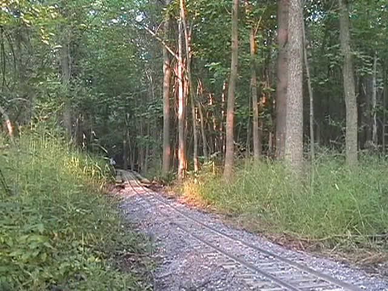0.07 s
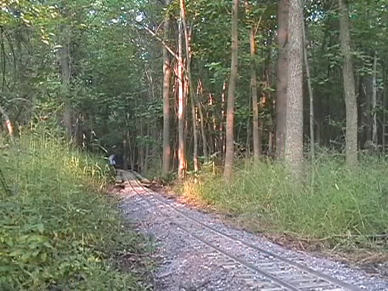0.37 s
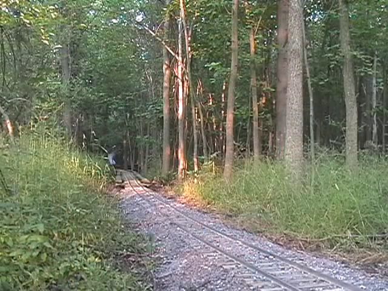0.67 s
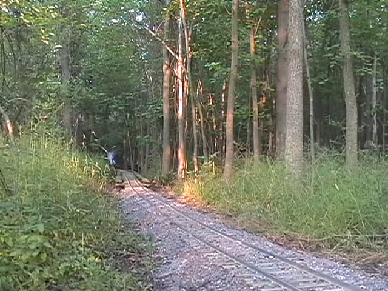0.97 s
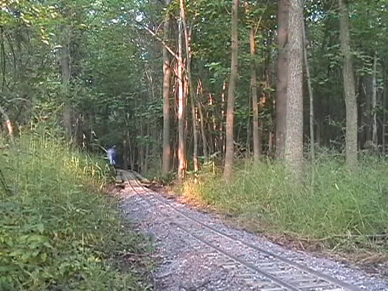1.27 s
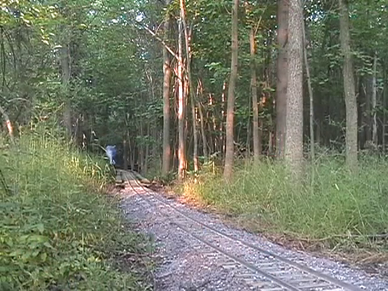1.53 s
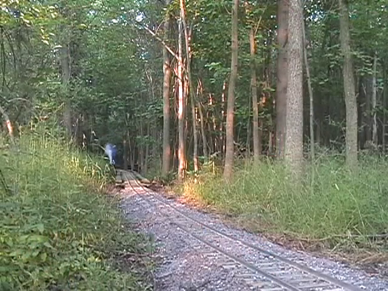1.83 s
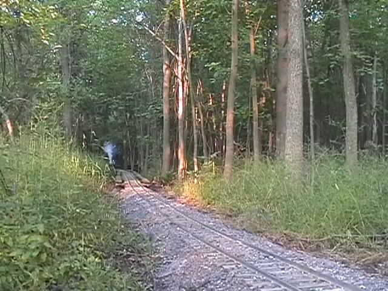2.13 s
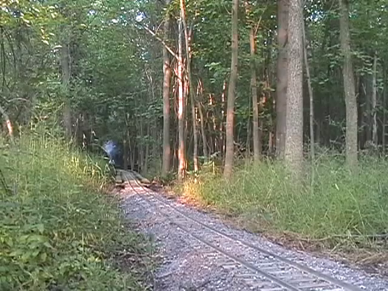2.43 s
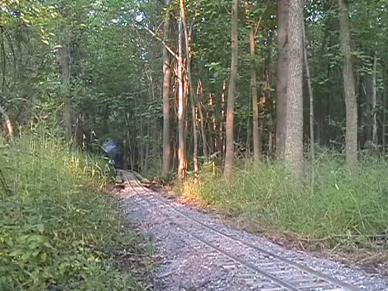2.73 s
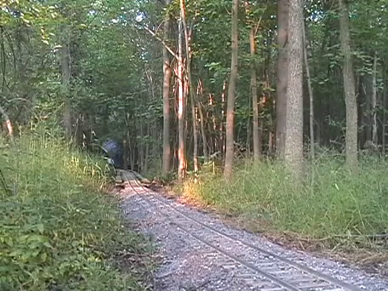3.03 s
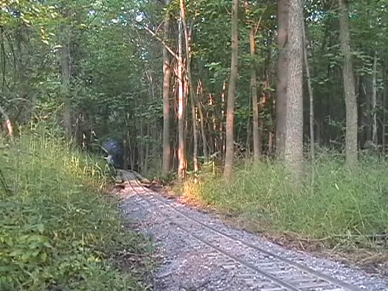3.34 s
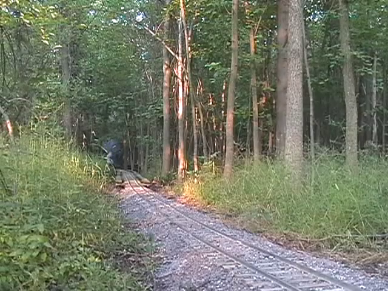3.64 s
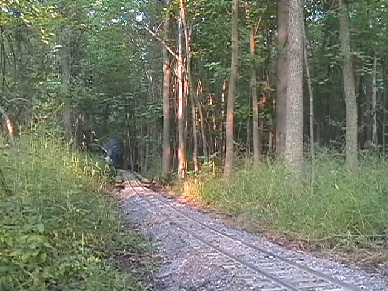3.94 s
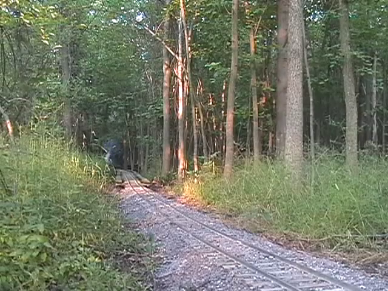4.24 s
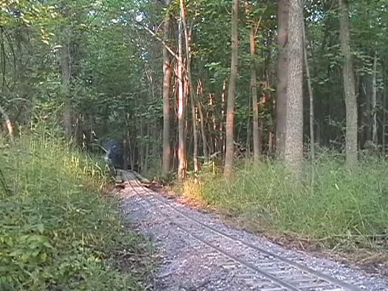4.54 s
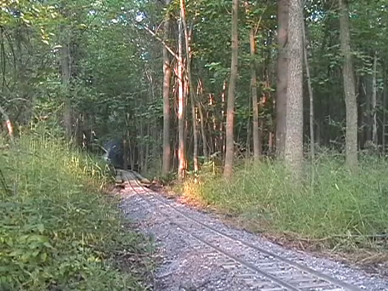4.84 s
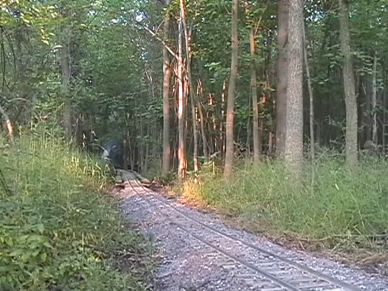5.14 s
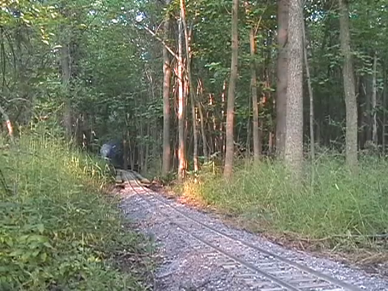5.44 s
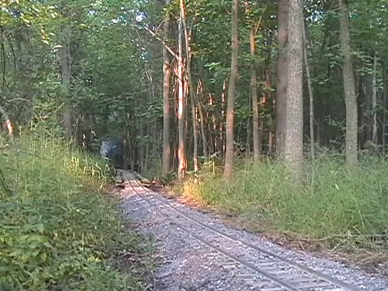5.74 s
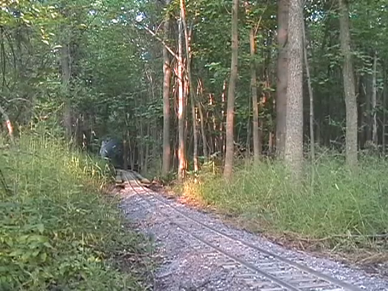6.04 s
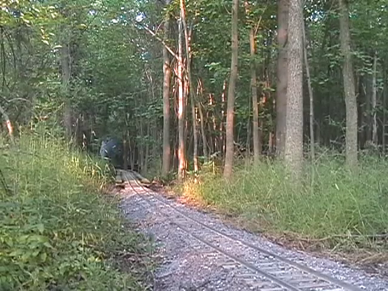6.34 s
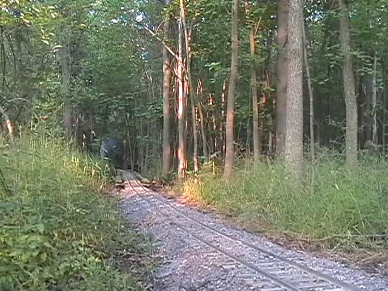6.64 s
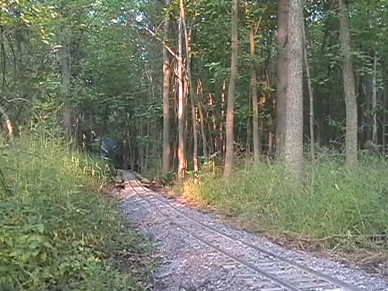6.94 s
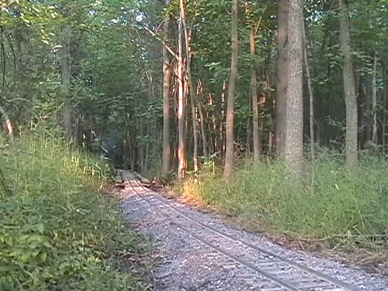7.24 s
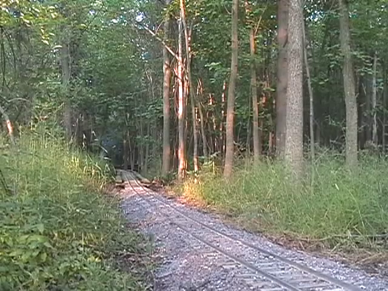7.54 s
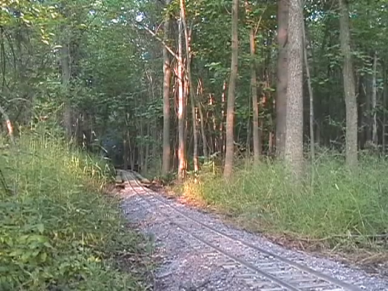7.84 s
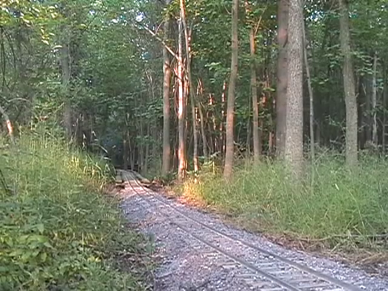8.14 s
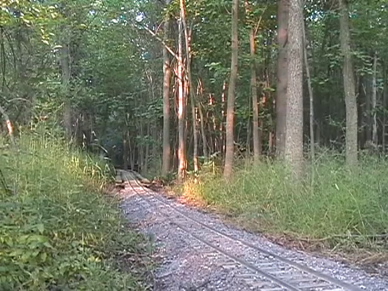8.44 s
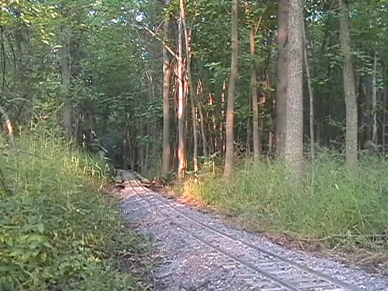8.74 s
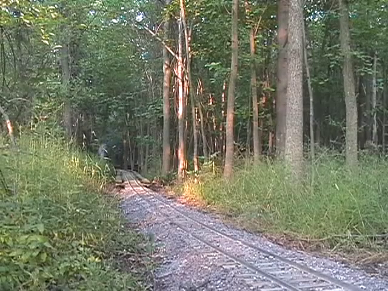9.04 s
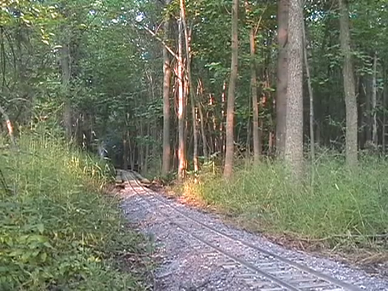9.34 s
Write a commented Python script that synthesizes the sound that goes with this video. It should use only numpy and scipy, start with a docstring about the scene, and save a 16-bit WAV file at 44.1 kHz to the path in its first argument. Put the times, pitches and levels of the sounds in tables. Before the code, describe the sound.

A small steam locomotive far off in the woods blows a high one-note whistle. A long blast swells from a breathy tone into a wavering note wrapped in steam hiss. Faint airy toots follow, then a louder long blast, a few quick toots and a final strong blast. Each echoes among the trees. Underneath, a faraway motor vehicle gathers speed and changes gear over a low rumble. The microphone stays still, at a distance.

```python
"""In the woods, a small steam locomotive far off blows its one-note whistle: three long blasts, a few toots.
Eased open, the whistle's bell only breathes; pulled hard, it locks into a wavering note in a hiss of
steam, and the trees scatter the note. Steam leaking past the valve rings hollow all the while.
Farther away a motor vehicle gathers speed and changes gear, over the low rumble of the still woods."""
import sys
import numpy as np
from scipy import signal
from scipy.fft import rfft, irfft
from scipy.io import wavfile
from scipy.ndimage import uniform_filter1d

SR = 44100
rng = np.random.default_rng(int(sys.argv[2]) if len(sys.argv) > 2 else 0)


def log_audio(samples):
    """Write samples as a 16-bit WAV file to the path given in sys.argv[1]."""
    # one column per channel
    frames = np.atleast_2d(samples).T
    # limit to full scale, then quantise
    limited = np.clip(frames, -1, 1)
    pcm = np.round(limited * 32767).astype(np.int16)
    wavfile.write(sys.argv[1], SR, pcm)


N = 418950
T = np.arange(N) / SR
HZ = np.fft.rfftfreq(N, 1 / SR)
FULL_VOICE_DB = -17.5  # note level from which the whistle is fully voiced
APPROACH_DB_PER_S = 0.84  # the leak past the shut valve grows as the locomotive nears


def gain_of(db):
    """Decibels to amplitude."""
    return 10 ** (np.asarray(db) / 20)


def unit_rms(x):
    """Scales to rms 1."""
    return x / np.sqrt(np.mean(x ** 2) + 1e-20)


def value_at(points, hz):
    """Reads (frequency, value) points on a log-frequency axis."""
    freq, value = np.transpose(points)
    return np.interp(np.log(hz + 1), np.log(freq), value)


def curves(rows):
    """Joins each column of a (time, values...) table by straight lines."""
    times, *columns = np.transpose(rows)
    return [np.interp(T, times, column) for column in columns]


def envelope(start, length, rise_s, fall_s):
    """Rises in a straight line, holds, then dies away."""
    attack = np.clip((T - start) / rise_s, 0, 1)
    return attack * np.exp(-np.clip((T - start - length) / fall_s, 0, np.log(1e12)))


def wander(rate_hz, size=32768):
    """Random drift of rms about 1, with little motion above the rate."""
    lowpass = 1 / (1 + (HZ[:size // 2 + 1] / rate_hz) ** 2)
    drift = irfft(rfft(rng.standard_normal(size)) * lowpass)
    return np.interp(T, np.linspace(0, T[-1], size), unit_rms(drift))


def noise(spectrum):
    """Stereo noise of rms 1, coloured by (frequency [Hz], level [dB]) points."""
    # how alike the two sides are: (frequency [Hz], correlation [0-1])
    likeness = [(60, 1), (110, 0.62), (200, 0.33), (380, 0.49), (700, 0.63), (1290, 0.76), (2400, 0.87),
                (5000, 0.86), (6800, 1), (8300, 0.48), (10000, 0.66), (15000, 1)]
    alike = np.clip(value_at(likeness, HZ), 0, 1)
    left, other = rfft(rng.standard_normal((2, N)))
    right = alike * left + np.sqrt(1 - alike ** 2) * other
    return unit_rms(irfft(np.array([left, right]) * gain_of(value_at(spectrum, HZ)), N))


def ringing(modes):
    """Steam noise through a few steady resonances."""
    hz = np.geomspace(200, 16000, 900)
    power = sum(gain_of(db) ** 2 / (1 + ((hz - centre) / width) ** 2) ** 2 for centre, width, db in modes)
    return noise(np.column_stack([hz, 10 * np.log10(power)]))


def tilted(x, tilt_db, pivot_hz=6000):
    """Moving tilt EQ: four overlapping bands tip the spectrum by roughly tilt_db per octave."""
    octaves = np.clip(np.log2((HZ + 1) / pivot_hz), -2, 1)
    spectrum = rfft(x)
    return sum(gain_of(centre * tilt_db) * irfft(spectrum * np.maximum(1 - abs(octaves - centre), 0), N)
               for centre in (-2.0, -1.53, 0.03, 0.9658))


def forest_air(level_db=-46.5):
    """The bed: a low distant rumble and a thin steady hiss among the trees."""
    # low and high halves of the bed's spectrum: (frequency [Hz], relative level [dB])
    rumble = [(20, -18), (36, -12), (47, 3.5), (58, -0.5), (75, 7.5), (95, 11.5), (120, 15.5), (150, 6),
              (240, 9), (310, 5), (520, 3.5), (610, 1.5), (1000, 6), (1300, 2.5)]
    hiss = [(1450, -5), (1950, 4), (2300, -5.5), (2650, -14), (3050, 1.5), (3900, -5.5), (4600, -11),
            (5500, -4), (6300, -7.5), (8000, -16), (12000, -19), (15500, -27)]
    return gain_of(level_db) * noise(rumble + hiss)


def vehicle(unsteady=0.011, fading_db=0.65):
    """Orders of an unevenly firing engine slide through the boom of its exhaust, each fading on its way."""
    # engine speed: (time [s], working cycles [Hz])
    revs = [(0, 13), (1, 15.7), (3, 14.6), (4, 16.7), (5, 18.4), (6.6, 21.5), (7, 25.3), (7.27, 24.8),
            (7.55, 21), (8.2, 17.4), (9.5, 21.6)]
    # the exhaust under throttle: (time [s], level [dB], lift of the upper orders [dB])
    throttle = [(0, -53.5, 2), (3, -49, -14.5), (5.2, -43, -7), (5.6, -47.5, -5), (6.7, -38, -4),
                (7.22, -40, 0), (7.66, -54.5, 5), (7.95, -47, 1.5), (8.4, -45.5, -3.5), (8.9, -51, -3),
                (9.5, -71.5, -8.5)]
    # uneven firing: (multiple of the cycle, relative level [dB])
    orders = [(4, -13), (5, 1), (6, -7.5), (7, 1.5), (8, -9), (9, -2), (10, -8.5), (11, -3), (12, -4.5),
              (13, -10.5), (14, -7), (16, -8.5)]
    # the exhaust pipe heard through the woods: (frequency [Hz], gain [dB])
    pipe = [(55, -28), (80, -22), (100, -5), (112, -4), (124, -2), (135, -7.5), (146, -9.5), (168, -7),
            (190, -10), (222, -7), (280, -13.5), (330, -7.5), (400, -17)]
    cycle_hz, = curves(revs)
    level_db, lift_db = curves(throttle)
    phase = 2 * np.pi * np.cumsum(cycle_hz * (1 + unsteady * wander(rate_hz=5.7))) / SR
    drone = np.zeros(N)
    for order, db in orders:
        hz = order * cycle_hz
        upper = np.clip((hz - 130) / 50, 0, 1)
        order_db = db + value_at(pipe, hz) + upper * lift_db + fading_db * wander(rate_hz=2.7)
        drone += gain_of(order_db) * np.cos(order * phase + 2 * np.pi * rng.random())
    return np.sqrt(2) * gain_of(level_db) * drone


def valve(shut_db=-55.5, close_s=0.055, sag=0.16):
    """Pulls on the valve set the jet's level and tilt and how loudly the valve sings."""
    # pulls: (start [s], length [s], opening time [s], hiss [dB], tilt [dB/octave], singing [dB])
    pulls = [(0.07, 1, 0.059, -47.5, 6, -49), (0.882, 0.44, .16, -33.5, 3.2, -50),
             (1.277, 0.64, 0.06, -32.5, 4.5, -60), (1.9, 0.51, 0.061, -33.5, 3.5, -62),
             (3.0, 0.42, 0.067, -50.5, 1, -65), (3.206, 0.085, 0.042, -45.5, 3, -58),
             (3.8, .51, 0.055, -46, 3, -51.5), (4.424, 0.78, 0.074, -45, 2.5, -53),
             (5.033, 1.2, 0.15, -29.5, 2.5, -59), (6.17, .61, 0.051, -28.5, 3.5, -62),
             (7.15, .37, 0.086, -40.5, 0.5, -44), (7.947, 0.029, 0.017, -59, -2, -66),
             (8.128, 0.52, 0.043, -49, 1, -64), (8.217, .12, .04, -46, -3.5, -62),
             (8.548, 0.33, 0.079, -38.5, 0.5, -42), (8.839, 0.69, 0.061, -30, 2, -44)]
    power = gain_of(shut_db + APPROACH_DB_PER_S * (T - T[-1] / 2)) ** 2
    weighted_tilt, singing_power = np.zeros(N), np.zeros(N)
    for start, length, rise_s, hiss_db, tilt_db, sing_db in pulls:
        arch = 1 - sag * (2 * np.clip((T - start) / length, 0, 1) - 1) ** 2  # weaker at both ends
        flow = envelope(start, length, rise_s, close_s) * arch
        hiss_power = (flow * gain_of(hiss_db)) ** 2
        power += hiss_power
        weighted_tilt += hiss_power * tilt_db
        singing_power += (flow * gain_of(sing_db)) ** 2
    return 10 * np.log10(power), weighted_tilt / power, np.sqrt(singing_power)


def overblowing(hz, onset_hz=1413, full_hz=1448):
    """How far the bell is overblown: 0 at its own pitch, 1 when pushed fully sharp."""
    return np.clip((hz - onset_hz) / (full_hz - onset_hz), 0, 1)


def steam_resonances(singing, note_db, hz, leak_db=-53, shrill_db=-20.5):
    """Steam rings hollow past the shut valve, higher past the half-open one, shrill at the overblown lip."""
    # resonances of each: (frequency [Hz], width [Hz], relative level [dB])
    shut_modes = [(1744, 52, 7), (2600, 77, 7.5), (2760, 140, 4.5), (3445, 150, 3), (3920, 160, -4.5),
                  (5580, 120, -4), (5870, 200, -11)]
    half_open_modes = [(4630, 140, 4.5), (5320, 470, 0.5), (8760, 430, -6)]
    lip_modes = [(3740, 125, 0), (4160, 120, -5)]
    hollow = gain_of(leak_db + APPROACH_DB_PER_S * T) * ringing(shut_modes)
    shrill = overblowing(hz) ** 2 * gain_of(note_db + shrill_db) * ringing(lip_modes)
    return hollow + singing * ringing(half_open_modes) + shrill


def steam_hiss(jet_db, tilt_db, note_db, eased_db=-50, open_db=-42):
    """The jet's hiss broadens as the valve opens; a lower rush off the bell's lip follows the note."""
    # wide-open jet, barely open jet and rush at the lip: (frequency [Hz], relative level [dB])
    jet_open = [(500, -41), (900, -11.5), (1600, -4), (2500, 5), (3500, 10.5), (5400, 3.5), (6800, -4),
                (8300, -3.5), (10500, -11), (12800, -16.5), (15500, -24.5)]
    jet_eased = [(700, -11), (1800, -0.5), (2700, 3), (3200, -25), (4000, 6), (4700, 5), (5600, -0.5),
                 (6500, -8.5), (7300, -7), (8700, -11), (10000, -14.5), (12300, -24), (13300, -24),
                 (15500, -28)]
    lip_rush = [(400, -52), (700, -25), (1050, -8), (1200, -34), (1350, 6.5), (1680, -1.5), (1950, -1),
                (2350, -10.5), (2700, -8), (3200, -9.5), (6000, -84)]
    opening = np.clip((jet_db - eased_db) / (open_db - eased_db), 0, 1)
    jet = np.sqrt(opening) * noise(jet_open) + gain_of(2.5) * np.sqrt(1 - opening) * noise(jet_eased)
    jet = tilted(jet, tilt_db + 1.86 * wander(rate_hz=5.1))  # the brightness drifts
    jet *= gain_of(jet_db + 1.5 + 0.74 * wander(rate_hz=2.7))  # slow gusts
    sounding_lip = gain_of(-34.5 + 0.5 * (note_db - FULL_VOICE_DB))
    idle_lip = gain_of(np.minimum(jet_db, eased_db) - 2)
    rush = np.hypot(sounding_lip, idle_lip) * noise(lip_rush)
    flutter = gain_of(0.79 * wander(rate_hz=70))
    return (jet + rush) * flutter * gain_of([[0.4], [-0.4]])  # a touch to the left


def scatter(x, t60, count):
    """Echoes from count trunks within 1.5 s, of random sign and dying away."""
    taps = np.zeros(SR * 3 // 2)
    delays = rng.integers(0, len(taps), count)
    taps[delays] = rng.choice([-1., 1.], count) * gain_of(-60 * delays / SR / t60)
    return signal.fftconvolve(x, taps / np.linalg.norm(taps))[:N]


def through_woods(x, echo_s=0.175):
    """The straight path, quick echoes off near trunks, a long deep tail and one slap off the tree line."""
    near = gain_of(-6) * scatter(x, t60=0.67, count=1500)
    tail = gain_of(-14) * scatter(x, t60=3.25, count=3000)
    slap = gain_of(-11.5) * np.pad(x, (round(echo_s * SR), 0))[:N]
    middle = gain_of(1) * x + near + tail + slap
    side = gain_of(-9) * scatter(x, t60=1.0, count=2000)
    return np.array([middle + side, middle - side]) * gain_of([[0.9], [-0.9]])  # slightly left


def whistle_phrase(ring_s=0.03):
    """The bell's level, pitch, brightness and readiness to lock, through the blasts and toots."""
    # three long blasts, a list each: (time [s], level [dB], pitch [Hz], overtone brightness [dB])
    blasts = [
        [(0.1, -62, 1380, -9), (0.28, -34.5, 1384, -28), (0.63, -27.5, 1380, -23), (0.85, -27.5, 1381, -27),
         (0.95, -17.5, 1386, -18.5), (1.13, -18, 1396, -14.5), (1.43, -19, 1391, -25), (1.52, -36, 1377, -12),
         (1.56, -27.5, 1380, -28), (1.65, -31.5, 1381, -13.5), (1.79, -31.5, 1396, -20), (2.3, -65, 1375, -1),
         (2.45, -45, 1378, -5)],
        [(4.93, -44.5, 1396, 21), (5.164, -14.5, 1374, -25), (5.32, -25.5, 1435, -23),
         (5.548, -14.5, 1400, -22.5), (5.596, -20.5, 1408, -19.5), (5.804, -9.5, 1396, -22),
         (5.836, -20, 1403, -20), (6.074, -11.5, 1385, -21), (6.2, -26.5, 1407, -23), (6.278, -17, 1425, -25),
         (6.362, -24, 1476, -26), (6.444, -17.5, 1458, -25), (6.622, -16, 1451, -35.5), (6.8, -26, 1431, -20)],
        [(8.54, -63, 1360, 2), (8.596, -34, 1332, -15), (8.828, -27.5, 1388, -27), (8.908, -11, 1373, -15.5),
         (9.178, -16, 1386, -14.5), (9.216, -7, 1385, -21), (9.286, -19, 1395, -7.5), (9.406, -12, 1377, -20),
         (9.5, -17.5, 1407, -3)],
    ]
    # light, breathy toots: (start [s], length [s], level [dB], pitch [Hz])
    toots = [(3.17, 0.29, -52, 1385), (3.85, .2, -44, 1361), (4.125, 0.23, -36.5, 1374),
             (4.5, 0.52, -44.5, 1374), (7.178, 0.177, -35, 1362), (7.3, 0.152, -26, 1385),
             (7.42, 0.13, -22.5, 1367)]
    notes = []
    for blast in blasts:
        level_db, hz, bright_db = curves(blast)
        start, end = blast[0][0], blast[-1][0]
        gate = envelope(start, end - start, ring_s, ring_s)  # the bell rings on after the steam stops
        notes.append((gain_of(level_db) * gate, hz, bright_db, 1))
    for start, length, level_db, hz in toots:
        swell = np.sin(np.pi * np.clip((T - start) / length, 0, 1))
        notes.append((gain_of(level_db) * swell, hz, 0, 0))
    levels, *traits = zip(*notes)
    levels = np.array(levels) + 1e-9
    total = levels.sum(0)
    # where notes overlap, the louder one leads
    blended = [sum(level * value for level, value in zip(levels, trait)) / total for trait in traits]
    return 20 * np.log10(total), *blended


def whistle(note_db, hz, bright_db, can_lock, breathy_db=-36, throb_hz=11.1, beat_s=0.173):
    """Steam rings the bell as a fuzzy resonance or, blown harder, locks it into a tone with overtones."""
    # overtones of the locked tone: (multiple of the pitch, relative level [dB])
    partials = [(2, -11), (3, -16), (4, -18), (5, -36), (6, -54)]
    overblown = overblowing(hz)  # loosens the lock and dulls the overtones
    voiced = can_lock * np.clip((note_db - breathy_db) / (FULL_VOICE_DB - breathy_db), 0, 1)
    locked = 0.95 * voiced * (1 - 0.38 * overblown)
    reedy = voiced ** 2 * gain_of(bright_db + 12 * (1 - overblown))
    # the pitch throbs with the engine's beat, one crest falling at 5.5 s
    hz = hz + throb_hz * voiced * np.cos(2 * np.pi * (T - 5.5) / beat_s)
    # wet, turbulent steam shakes the pitch, makes each overtone sputter and flutters the note
    shake = 1 + 0.003994 * wander(rate_hz=20) + 0.00253 * wander(rate_hz=200)
    phase = 2 * np.pi * np.cumsum(hz * shake) / SR
    overtones = sum(gain_of(db) * (1 + 0.64 * wander(rate_hz=100)) * np.cos(k * phase)
                    for k, db in partials)
    flutter = 1 + 0.27 * wander(rate_hz=48)
    tone = np.sqrt(2) * (flutter * np.cos(phase) + reedy * overtones)
    # unlocked, the bell only filters the steam: a narrow band at the note and a faint one an octave up
    breath = wander(rate_hz=41) * np.cos(phase) + wander(rate_hz=41) * np.sin(phase)
    breath += gain_of(-21) * wander(rate_hz=100) * np.sin(2 * phase)
    voice = np.sqrt(locked) * tone + np.sqrt(1 - locked) * gain_of(-1.5) * breath
    return gain_of(note_db - 2.5) * voice


def scene():
    """Whistle and steam over the far vehicle and the still woods."""
    jet_db, tilt_db, singing = valve()
    note_db, hz, bright_db, can_lock = whistle_phrase()
    note = through_woods(whistle(note_db, hz, bright_db, can_lock))
    steam = steam_hiss(jet_db, tilt_db, note_db) + steam_resonances(singing, note_db, hz)
    return note + steam + vehicle() + forest_air()


def limiter(x, ceiling_db=-9.5, recovery_db_per_s=120):
    """Ducks at once when the power passes the ceiling, then lets the gain come back."""
    power_db = 10 * np.log10(abs(uniform_filter1d((x ** 2).mean(0), size=200)) + 1e-12)
    release_db = T * recovery_db_per_s
    held_db = np.maximum.accumulate(power_db + release_db) - release_db
    excess_db = np.maximum(held_db - ceiling_db, 0)
    return x / gain_of(uniform_filter1d(excess_db, size=200))


def record(dry, comb_hz=300, echo_s=0.001, cutoff_hz=15750):
    """Colours the mix with a comb of narrow dips and a faint short echo, limits it and cuts the top."""
    delay = np.exp(-2j * np.pi * HZ / comb_hz)
    comb = (1 - 0.9 * delay) / (1 - 0.76 * delay)
    echo = 1 - 0.053 * np.exp(-2j * np.pi * HZ * echo_s)
    taps = irfft(comb * echo, N)[None, :4096]
    coloured = signal.oaconvolve(dry, taps, axes=1)[:, :N]
    lowpass = signal.firwin(511, cutoff_hz, window=("kaiser", 9), fs=SR)
    return signal.oaconvolve(limiter(coloured), lowpass[None], "same")


dry = scene()
out = record(dry)
log_audio(out)
```